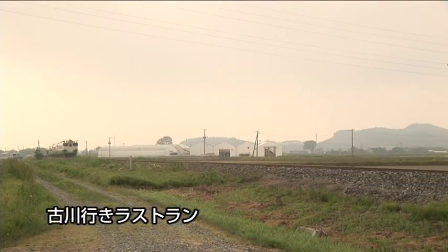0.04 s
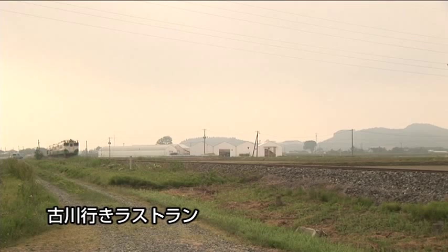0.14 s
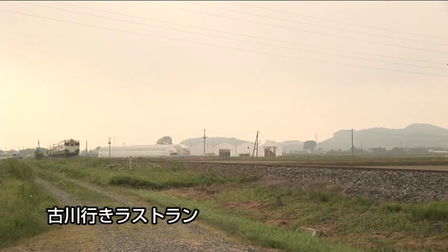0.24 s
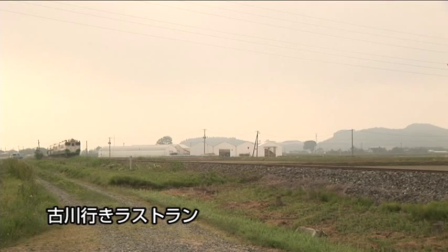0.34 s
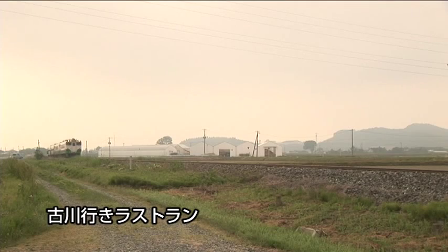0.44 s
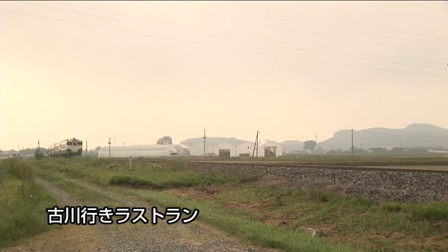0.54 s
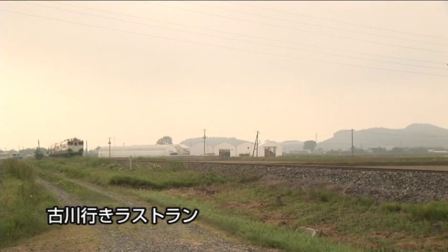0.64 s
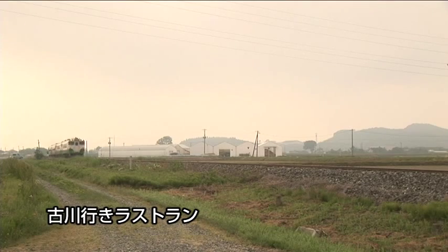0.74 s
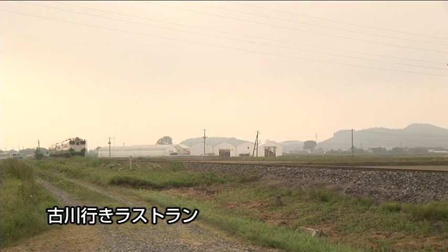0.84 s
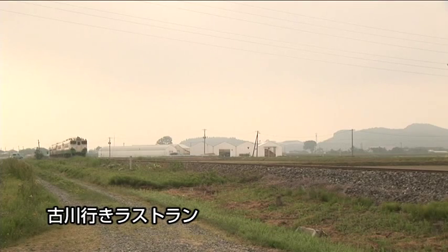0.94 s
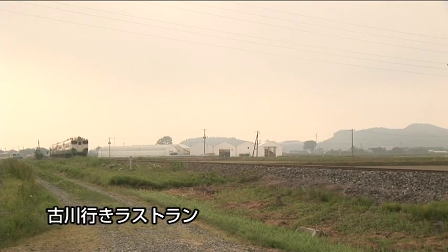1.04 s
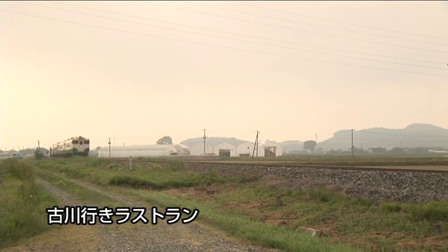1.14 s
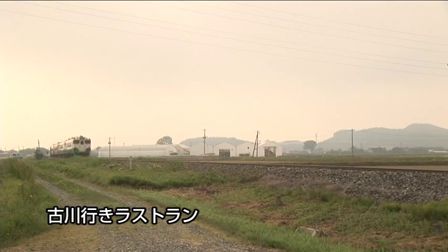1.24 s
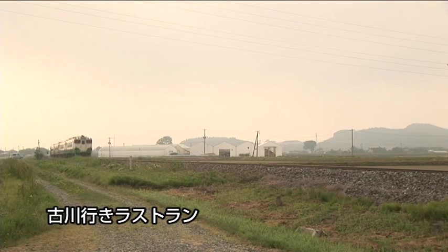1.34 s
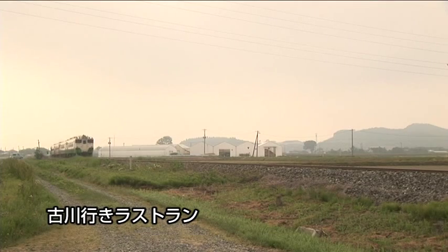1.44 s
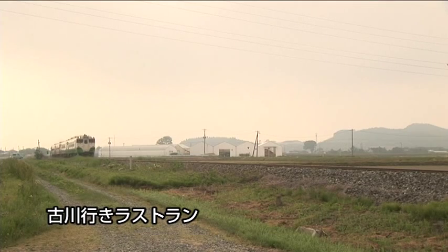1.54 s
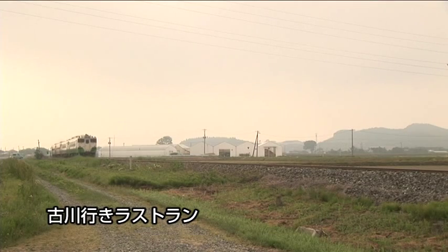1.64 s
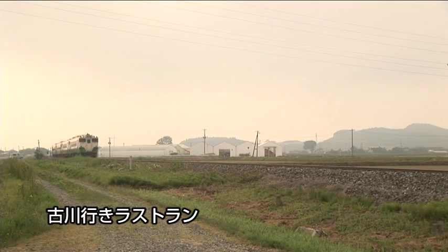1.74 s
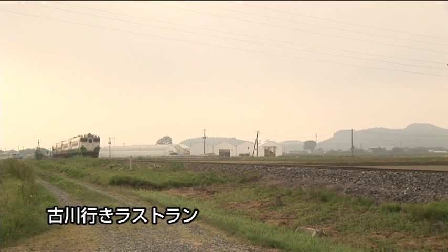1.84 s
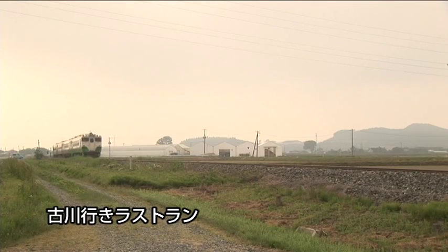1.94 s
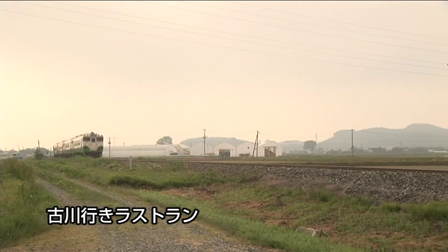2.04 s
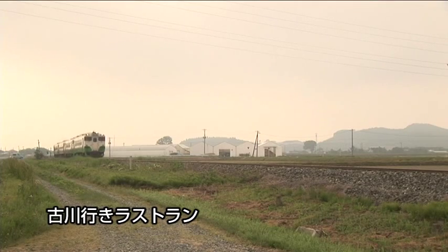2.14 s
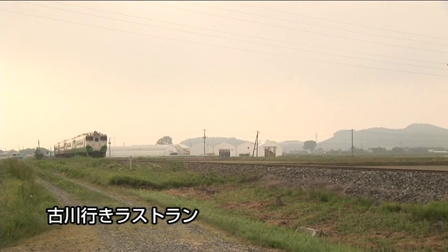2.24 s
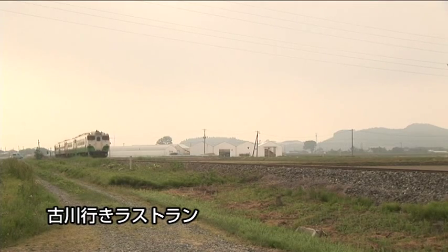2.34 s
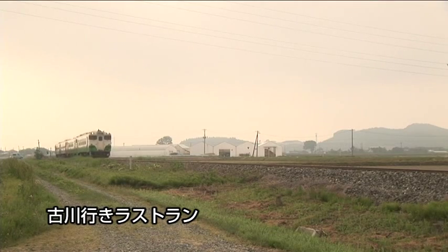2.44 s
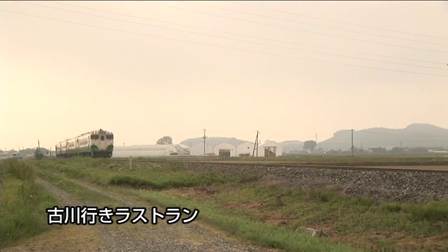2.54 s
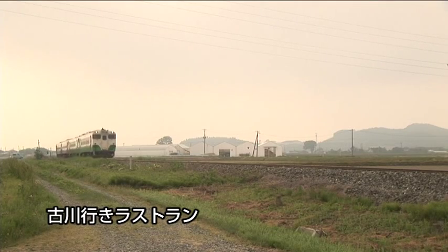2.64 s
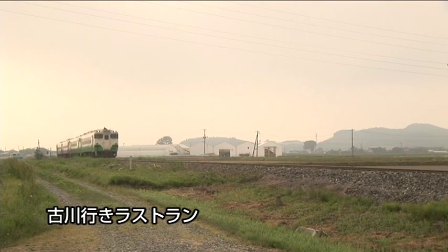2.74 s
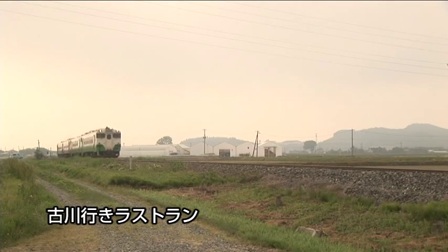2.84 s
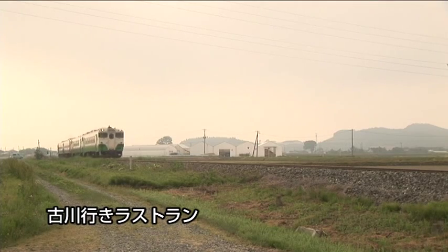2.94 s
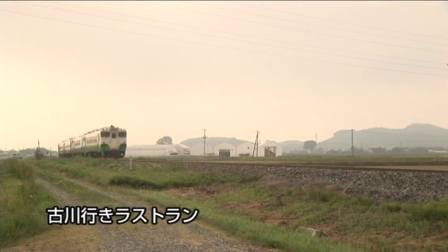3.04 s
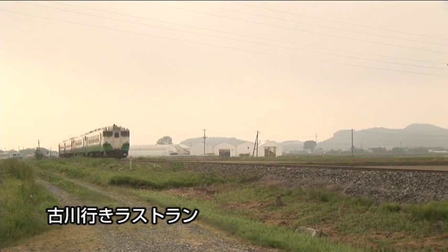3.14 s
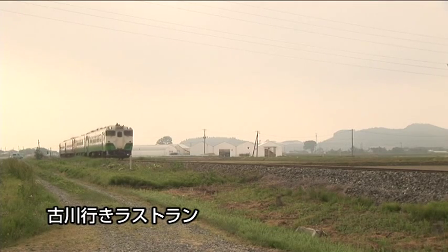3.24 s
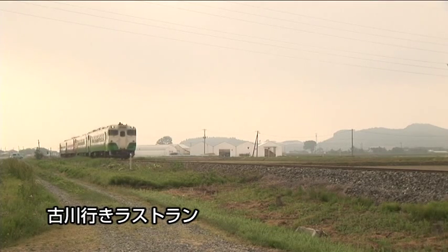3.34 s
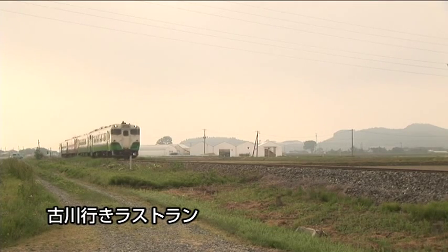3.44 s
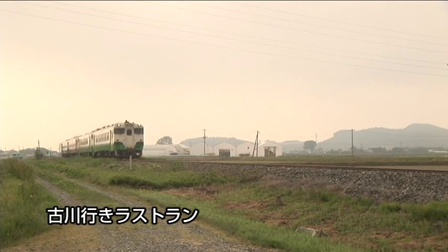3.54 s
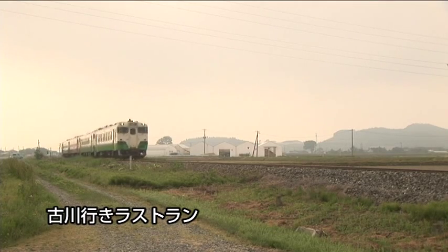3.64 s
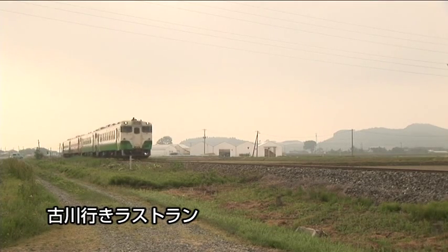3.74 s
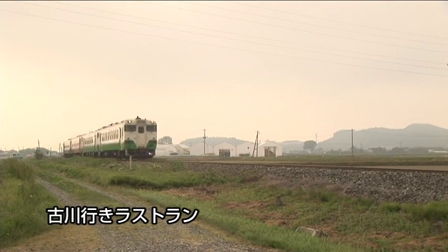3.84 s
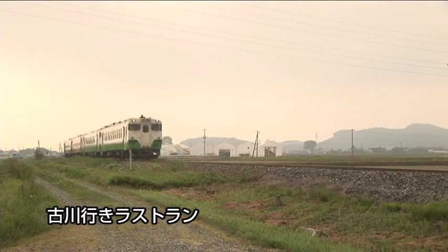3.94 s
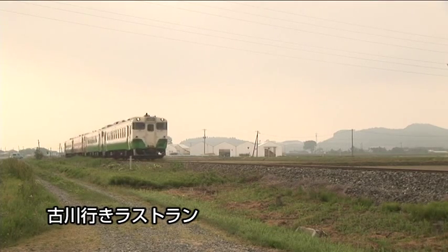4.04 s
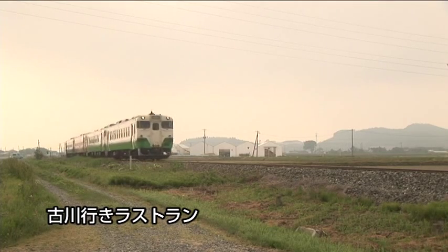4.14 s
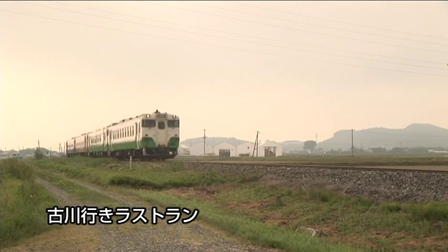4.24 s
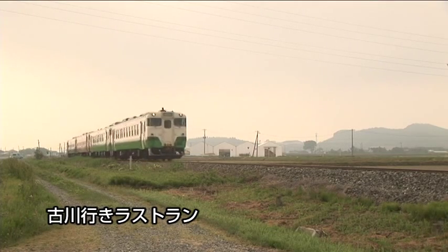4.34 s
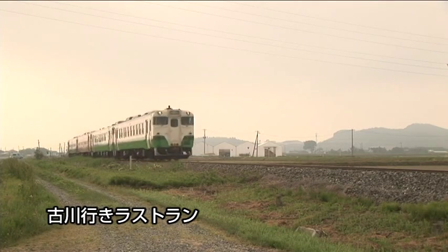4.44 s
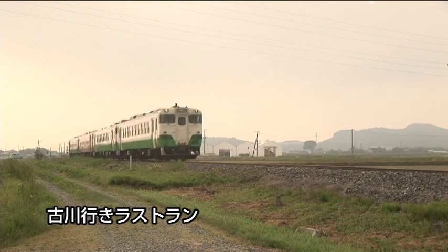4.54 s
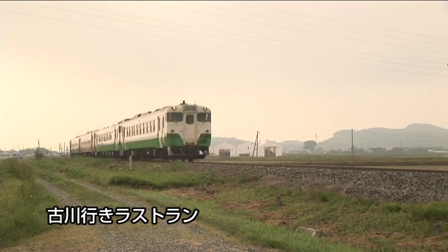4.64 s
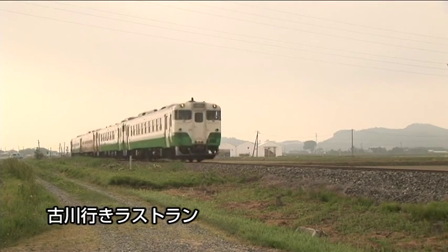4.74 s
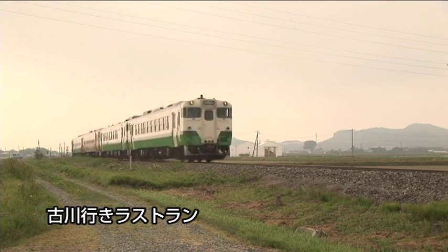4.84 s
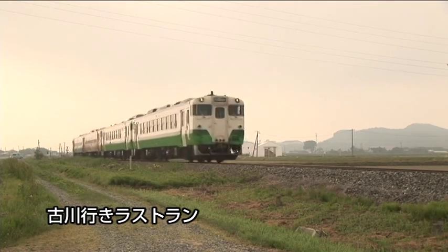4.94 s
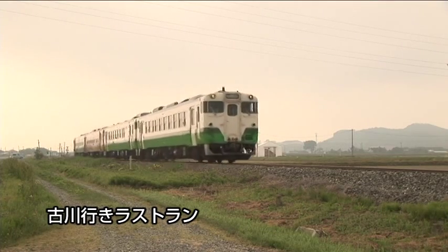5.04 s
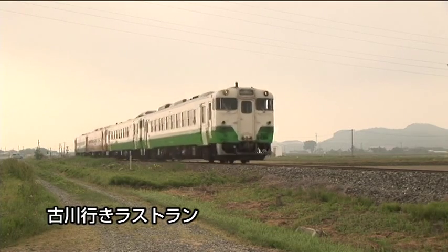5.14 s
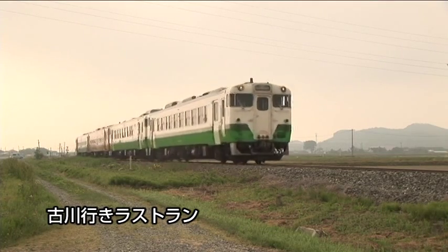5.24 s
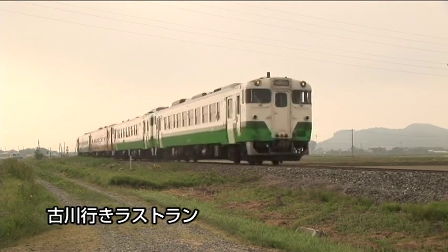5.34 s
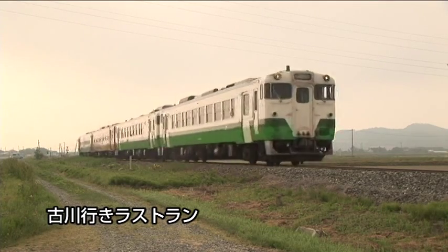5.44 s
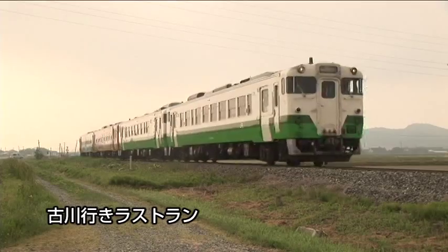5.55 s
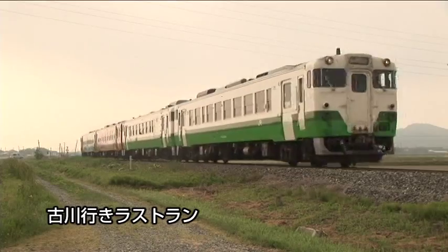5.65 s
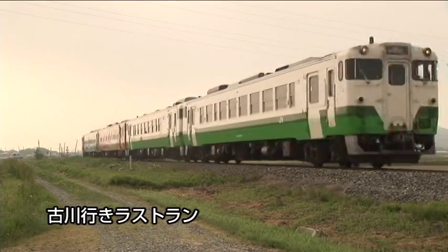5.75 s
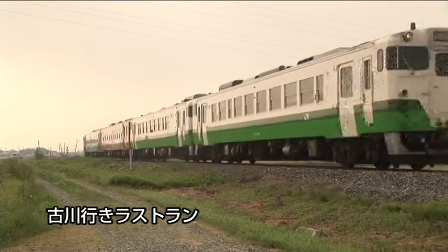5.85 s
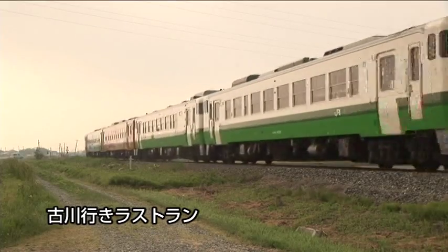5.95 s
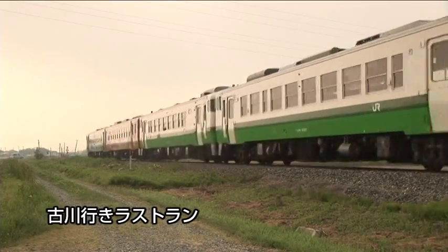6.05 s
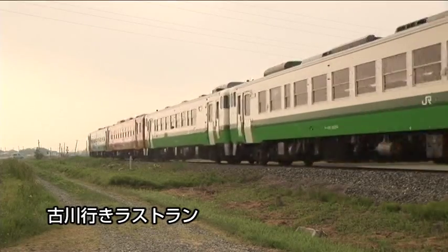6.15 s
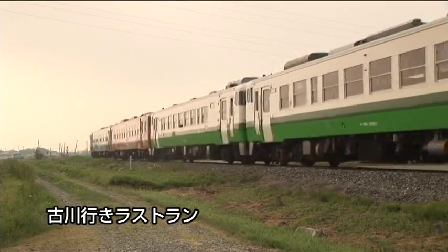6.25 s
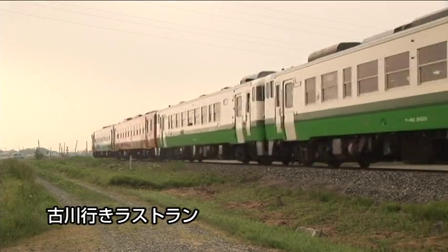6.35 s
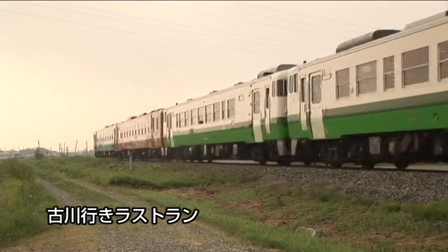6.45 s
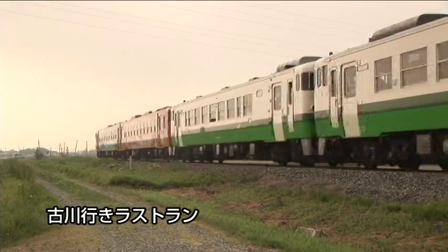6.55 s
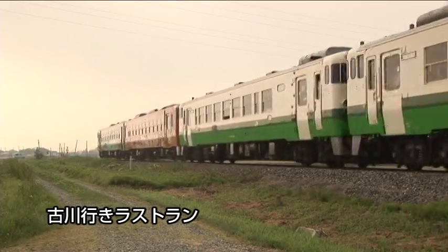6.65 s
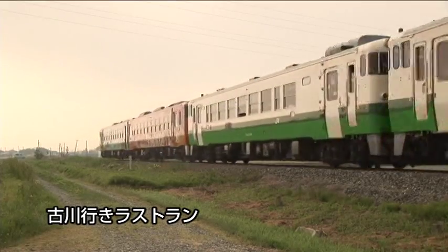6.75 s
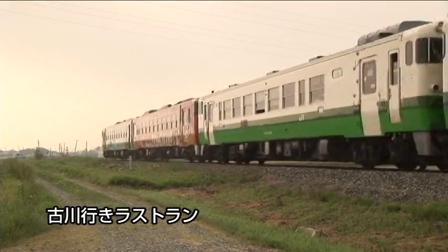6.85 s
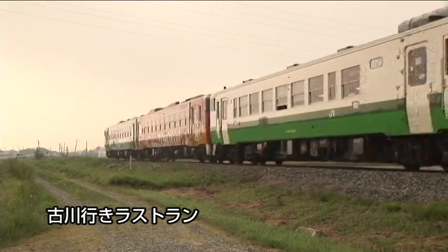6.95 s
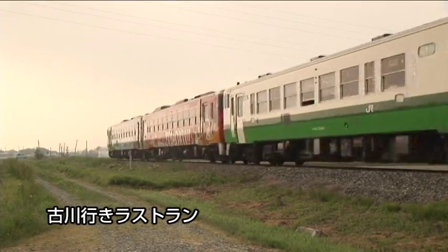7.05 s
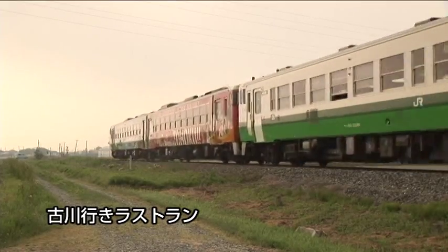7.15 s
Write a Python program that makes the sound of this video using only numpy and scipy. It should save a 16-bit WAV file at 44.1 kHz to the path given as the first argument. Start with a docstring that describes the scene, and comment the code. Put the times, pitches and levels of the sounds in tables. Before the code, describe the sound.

Outdoors in open farmland, a fixed stereo microphone beside the track hears small birds chirping and a distant diesel railcar's low drone. Paired wheel knocks over rail joints grow stronger, with soft echoes from buildings on the right. Rolling roar and metallic wheel singing swell, then the cars rush by close on the right with heavy clacks, gear whine and airy hiss, still passing at the end.

```python
"""An exhaust drone comes nearer as a diesel railcar set crosses open fields and passes close on the right.
Drone and gear whine are Doppler-shifted shaft orders; wheel roar, air hiss, field and breeze are shaped noise.
Rail joints knock in pairs, each a blow and a dying rattle through resonances; far buildings on the right
throw knocks back. Small birds chirp in gliding whistles over a faint shimmer of short falling notes."""
import sys
import numpy as np
from scipy import signal
from scipy.fft import rfft, irfft, next_fast_len
from scipy.io import wavfile
from scipy.ndimage import uniform_filter1d, map_coordinates

SR = 44100
rng = np.random.default_rng(int(sys.argv[2]) if len(sys.argv) > 2 else 0)


def unload_audio(sound):
    """Save the sound as a 16-bit wav file, at the path given as the first command line argument."""
    columns = np.transpose(np.atleast_2d(sound))
    # keep every value between -1 and 1, then stretch to whole-number steps
    steps = np.round(np.clip(columns, -1, 1) * 32767)
    wavfile.write(sys.argv[1], SR, steps.astype(np.int16))


def makeup_ratio(level_db):
    """Linear amplitude ratio for a level in decibels (20 dB per factor of ten)."""
    decades = np.asarray(level_db, float) / 20
    return 10 ** decades


N = 317079

# The approaching train. Each row: time in s, rolling roar ahead in dB before air dulling, air hiss in dB.
TRAIN = [(0.0, -56, -82), (0.64, -51, -86), (1.1, -51, -82), (1.6, -47, -93), (2.98, -43.5, -86),
         (3.48, -38, -68), (3.94, -36.5, -68), (4.39, -34, -63), (4.95, -29.5, -60), (5.25, -27, -55.5),
         (5.54, -23.5, -46.5), (5.97, -20, -49.5), (6.29, -17.5, -41.5), (6.75, -27.5, -33),
         (7.19, -27.5, -35)]
# The cars alongside. Each row: time in s, their roar in dB, share of the train to the right (0-1).
ALONGSIDE = [(0, -65.5, 0), (3, -52.5, 0.01), (5, -48, 0.06), (5.6, -35.5, 0), (6, -28, 0.65),
             (6.3, -22, 0.8), (6.6, -17, 0.77), (6.9, -16.5, 0.98), (7.19, -17.5, 0.97)]
# Left-right correlation of sound from ahead. Each row: frequency in Hz, correlation (0-1).
ALIKE_AHEAD = [(100, 1), (300, 1), (700, 0.85), (1300, 0.83), (2000, 1), (3700, 1), (5000, 0.86),
               (5800, 0.11), (8500, 0.044), (10500, 0.73), (13000, 0.93), (15000, 0.17)]
# Left-right correlation of sound from the right. Each row: frequency in Hz, correlation (0-1).
ALIKE_RIGHT = [(100, 0.75), (400, 0.91), (1300, 0.61), (1900, 1), (3000, 0.75), (4800, 0.79), (6300, 0.93),
               (9000, 0.94), (14000, 0.7)]


def unit(x):
    """Scaled to rms 1."""
    return x / np.sqrt(np.mean(x ** 2) + 1e-20)


def along(points, hz):
    """(Hz, value) points read on a log frequency axis."""
    f, v = np.transpose(points)
    return np.interp(np.log(hz + 1), np.log(f + 1), v)


def curves(rows):
    """One value per sample for each column after the time."""
    s, *cols = np.transpose(rows)
    return [np.interp(np.arange(N) / SR, s, c) for c in cols]


def right_share():
    """Share of the train to the right, per sample."""
    return np.clip(curves(ALONGSIDE)[1], 0, 1)


def wobble(rate):
    """A smooth random curve, rate knots a second."""
    return map_coordinates(rng.standard_normal(int(N * rate / SR) + 4), [np.arange(N) * rate / SR])


def filtered(x, response):
    """x times a complex response of frequency."""
    m = next_fast_len(N + 8192)
    return irfft(rfft(x, m) * response(np.fft.rfftfreq(m, 1 / SR)), m)[..., :N]


def coloured(spectrum):
    """The gain of a (Hz, dB) table."""
    return lambda hz: makeup_ratio(along(spectrum, hz))


def resonant(peaks, top_hz=np.inf):
    """The causal response of a few (Hz, width Hz, dB) resonances, rolled off steeply above top_hz."""
    def response(f):
        total = 0
        for k, (centre, width, db) in enumerate(peaks):
            damping = 1j * f * width
            total = total + (-1) ** k * makeup_ratio(db) * damping / (centre * centre - f * f + damping)
        return total / (1 + 1j * f / top_hz) ** 4
    return response


def rush(response, alike, patchy_db=None):
    """Stereo noise of rms 1 and given left-right correlation, with time-frequency patches of gain if asked."""
    pair = rng.standard_normal((2, N))
    if patchy_db:
        z = signal.stft(pair, nperseg=512)[2]
        patches = uniform_filter1d(rng.standard_normal(z.shape[1:]), size=6, axis=0)
        patches = uniform_filter1d(patches, size=10, axis=1)
        pair = signal.istft(z * makeup_ratio(patchy_db * unit(patches)), nperseg=512)[1][:, :N]

    def mid_side_gain(hz):
        angle = np.arccos(np.clip(along(alike, hz), -1, 1)) / 2
        return response(hz) * [np.cos(angle), np.sin(angle)]

    mid, side = filtered(pair, mid_side_gain)
    return unit(np.array([mid + side, mid - side]))


def housing(x):
    """The microphone housing cancels a narrow band of what both ports share."""
    # Each row: centre in Hz, width in Hz, gain of the cancelled part in dB.
    cancelled = [(4700, 510, -0.65)]
    return filtered(x, lambda hz: 1 - resonant(cancelled)(hz))


def from_right(pair):
    """Sound from the right reaches the two ports at different levels and phases."""
    # Each row: frequency in Hz, left level over right in dB.
    left_over_right_db = [(170, 4), (340, 1.5), (700, -6), (1200, -7.5), (1800, -16), (2800, 2.5),
                          (4600, -8), (6500, 0.5), (8300, -7), (10000, 1), (12500, -16.5), (15000, -3)]
    # Each row: frequency in Hz, left phase lead over right in rad.
    left_lead_rad = [(100, 0), (340, -.4), (520, -1.3), (1300, -1), (1800, -.2), (3100, -.1), (4500, -2.2),
                     (5500, -3.3), (9100, -3.4), (10300, -6), (13000, -7.1)]
    half = np.array([[.5], [-.5]])

    def port_response(hz):
        level = makeup_ratio(half * along(left_over_right_db, hz))
        return level * np.exp(1j * half * along(left_lead_rad, hz))

    return filtered(pair, port_response)


def heard_hz(abreast_s, nearest_m):
    """Doppler: the shaft rate, raised while the source comes on and sinking as it passes."""
    # Engine shaft gathering a little speed. Each row: time in s, firing rate at rest in Hz.
    shaft = [(0, 75.6), (2, 76.82), (3.5, 77.85), (6, 78.43)]
    speed_m_s, sound_m_s = 25.5, 343
    past_m = speed_m_s * (np.arange(N) / SR - abreast_s)
    return curves(shaft)[0] / (1 + speed_m_s / sound_m_s * past_m / np.hypot(past_m, nearest_m))


def orders(shaft_hz, lines, drift_rad, drift_rate, waver_db):
    """Orders (multiple, rms dB) of a rotating shaft as sines, phase and size a little unsteady."""
    turn = 2 * np.pi * np.cumsum(shaft_hz) / SR
    total = 0
    for k, db in lines:
        size = makeup_ratio(db + waver_db * wobble(drift_rate))
        total = total + size * np.sin(k * turn + drift_rad * wobble(drift_rate))
    return np.sqrt(2) * total


def exhaust():
    """The firing drone: two shaft orders, swelling and sagging as the engines of the cars beat slowly."""
    # Each row: time in s, first order level in dB, second order level in dB.
    order_levels = [(0, -41, -59), (1.1, -42, -55), (1.6, -37.5, -50.5), (2.15, -35.5, -50.5),
                    (2.55, -40.5, -40.5), (3.0, -35.5, -46.5), (3.35, -30.5, -42.5), (3.95, -26.5, -40),
                    (4.3, -27.5, -40), (4.55, -35, -39.5), (4.75, -27, -38), (5.05, -22, -35.5),
                    (5.6, -18, -31.5), (5.9, -16, -37), (6.05, -18, -44), (6.22, -17, -34.5),
                    (6.55, -22, -36), (7.19, -21.5, -29.5)]
    shaft_hz = heard_hz(abreast_s=6.88, nearest_m=10)
    return orders(shaft_hz, zip((1, 2), curves(order_levels)), drift_rad=0.54, drift_rate=9, waver_db=0.1)


def gears():
    """Tooth meshes whine at shaft multiples, swelling in as the drive draws level."""
    def swell(peak_s, peak_db, loss_db):  # loss_db: lost half a second off the peak
        return peak_db - loss_db * (2 * (np.arange(N) / SR - peak_s)) ** 2

    shaft_hz = heard_hz(abreast_s=7.0, nearest_m=11)
    mesh_db = swell(6.59, -24, 7.8)
    strand_db = swell(6.84, -27.5, 20)
    double_db = swell(6.38, -24.5, 11)
    # a lower mesh, the main mesh, its upper strand
    low = [(10, mesh_db - 7.5), (14, mesh_db), (15, strand_db)]
    whine = orders(shaft_hz, low, drift_rad=.35, drift_rate=22, waver_db=3)
    return whine + orders(shaft_hz, [(28, double_db)], drift_rad=.5, drift_rate=30, waver_db=3)


def breeze():
    """Light air rumbles on both ports: low noise with a slowly wandering level."""
    # Each row: frequency in Hz, relative density in dB per Hz.
    spectrum = [(12, -24), (25, -10), (45, 0), (70, -8), (120, -50)]
    # Each row: time in s, level in dB.
    gust = [(0, -52), (1.0, -50.5), (1.6, -51), (2.6, -50), (4, -56), (7.19, -48)]
    return makeup_ratio(curves(gust)[0] + 1.5 * wobble(4.05)) * rush(coloured(spectrum), ALIKE_AHEAD)


def open_field():
    """The background of the fields: patchy wide noise at a constant overall level."""
    # Each row: frequency in Hz, relative density in dB per Hz.
    spectrum = [(100, -15), (300, 3.5), (600, 0.5), (1200, 2), (2500, -3), (5000, -12), (7000, -59),
                (12000, -53), (15500, -57)]
    alike = [(100, 1.0), (500, 0.33), (1500, 0.31), (2200, 0.86), (3500, 0.5), (4500, 0.037)]
    return makeup_ratio(-53.5) * rush(coloured(spectrum), alike, patchy_db=2.4)


def rumble():
    """Low rolling noise that grows about half as fast in dB as the roar."""
    # Each row: frequency in Hz, relative density in dB per Hz.
    spectrum = [(15, -34), (28, -10), (45, -1), (65, 8.5), (100, 2.5), (140, -6.5), (200, -16), (300, -78)]
    rumble_db = -41.5 + 0.53 * (curves(TRAIN)[0] + 44.5)
    return makeup_ratio(rumble_db + 0.37 * wobble(2.3)) * rush(coloured(spectrum), ALIKE_AHEAD)


def roar_ahead():
    """Wheels on rail roar as patchy noise and sing on their sharpest modes; air dulls them when far."""
    # Each row: frequency in Hz, relative density in dB per Hz.
    spectrum = [(110, -5), (190, -1), (199, -3.5), (309, -5), (378, -8.5), (1200, -3.5), (1500, -14.5),
                (2290, -1), (2800, -2.5), (3130, -8), (3960, -8), (4700, -18), (5080, -15), (5760, -30.5),
                (8000, -44), (10400, -61), (17600, -120)]
    # Singing modes. Each row: centre in Hz, width in Hz, relative level in dB.
    modes = [(2325, 30, -3), (2765, 25, 0), (3540, 25, -1)]
    roar_db = curves(TRAIN)[0]
    roar = makeup_ratio(roar_db + 0.38 * wobble(6.1)) * rush(coloured(spectrum), ALIKE_AHEAD, patchy_db=1.4)
    sing_gain = (1 - right_share()) * makeup_ratio(roar_db - 12.5 + 5.1 * wobble(2.92))
    roar = roar + sing_gain * rush(resonant(modes, top_hz=4500), ALIKE_AHEAD)
    # treble gains on the rest as the train nears
    dulling = makeup_ratio(np.clip(1.4 * (roar_db + 41.5), -5, 1)) - 1
    return roar + dulling * filtered(roar, lambda hz: 1 / (1 + (2900 / (hz + 1)) ** 6))


def roar_beside():
    """Rolling roar of the cars alongside: patchy, quickly wavering noise."""
    # Each row: frequency in Hz, relative density in dB per Hz.
    spectrum = [(60, -8), (110, -10.5), (160, -9), (390, -10), (810, -2), (970, -7.5), (1200, -4.5),
                (1500, -16), (2200, -4), (3300, -11), (5000, -15.5), (6000, -15.5), (7000, -28),
                (7800, -44), (10000, -70), (16500, -120)]
    beside_db = curves(ALONGSIDE)[0]
    return makeup_ratio(beside_db + 0.91 * wobble(11)) * rush(coloured(spectrum), ALIKE_RIGHT, patchy_db=1.8)


def air_hiss():
    """High air noise, shared by power between ahead and right as the train draws alongside."""
    # Each row: frequency in Hz, relative density in dB per Hz.
    spectrum = [(4240, -28), (7200, -18), (8330, -0.5), (9120, -1.5), (10300, -5), (11900, -6),
                (14500, -8.5), (15600, -6.5)]
    share = right_share()
    gain = makeup_ratio(curves(TRAIN)[1] + .7 * wobble(12))
    ahead = np.sqrt(1 - share) * gain * rush(coloured(spectrum), ALIKE_AHEAD)
    right = np.sqrt(share) * gain * rush(coloured(spectrum), ALIKE_RIGHT, patchy_db=.7)
    return ahead, right


def chirps_and_shimmer():
    """Short gliding whistles, far off to one side, which the ports take partly out of step."""
    # Bird notes. Each row: start in s, level in dB, start in Hz, end in Hz, length in s.
    chirps = [(.025, -61, 5350, 4750, .025), (.14, -57, 5160, 4700, 0.024), (.175, -60, 5150, 4800, .02),
              (.2, -60, 4170, 3920, .06), (.33, -56, 4000, 3900, .027), (.361, -56, 3950, 3870, 0.023),
              (.732, -60, 6060, 4700, 0.028), (0.86, -62, 4950, 5100, 0.041), (1.02, -59, 5150, 4780, .025),
              (1.42, -62, 5300, 4700, .022), (1.53, -57, 5350, 4770, .022), (2.108, -54, 4700, 5500, .015),
              (2.128, -61, 5950, 4700, 0.029), (2.255, -52, 4870, 4800, 0.027),
              (2.41, -61, 5070, 4800, .025), (2.815, -62, 5260, 4700, .025), (2.901, -58, 4700, 5000, .018),
              (2.93, -56, 5270, 4800, .025), (2.97, -57, 5200, 4870, .022), (3.805, -52, 5120, 4600, 0.032)]
    # faint random short falling notes, a shimmer near 5 kHz
    when, size, pitch = rng.random((45, 3)).T
    top_hz = 5200 + 300 * (pitch - .5)
    shimmer = zip(when * 3.6, -67.5 + 8 * (size - .5), top_hz, top_hz - 350, 0.028 * (.5 + pitch))
    notes = np.zeros(N + SR, complex)
    for s, db, start_hz, end_hz, length_s in [*chirps, *shimmer]:
        u = np.linspace(0, 1, int(length_s * SR))
        glide_hz = start_hz + (end_hz - start_hz) * u ** 1.33
        envelope = np.sqrt(np.abs(np.sin(np.pi * u)))
        whistle = np.exp(2j * np.pi * np.cumsum(glide_hz) / SR)
        notes[int(s * SR):][:len(u)] += makeup_ratio(db) * envelope * whistle
    # leaves and ground break the whistles up on the way
    flutter = makeup_ratio(3 * wobble(200)) * np.exp(.6j * wobble(350))
    call = flutter * notes[:N]
    return housing(call.real) + .7 * call.imag * np.array([[1], [-1]])


def axles(s, db, second_db, gap_s):
    """Times and levels of both axles of each bogie."""
    return np.r_[s, s + gap_s], np.r_[db, db + second_db]


def bursts(s, db, response, rise, t60, blow_db):
    """At each time a sharp blow and a dying noise rattle, both through one response."""
    t = np.arange(SR // 4) / SR
    at = (s * SR).astype(int)
    envelope = makeup_ratio(-60 * t / t60) * (1 - np.exp(-t / rise))
    rattle = signal.fftconvolve(np.bincount(at, makeup_ratio(db), N), envelope)[:N]
    ring = filtered(np.eye(1, N)[0], response)
    blows = np.bincount(at, makeup_ratio(db + blow_db), N)
    return rattle * rush(response, ALIKE_AHEAD) + filtered(blows, response) / np.abs(ring).max()


def joints():
    """Each joint shakes bogie, car body and wheel, each dying at its own speed; the bogie starts first."""
    # Bogies over joints. Each row: first axle in s, reference level in dB, second axle in dB re first,
    # thump and wheel ring in dB re reference; the parts add offsets below.
    bogies = [(0.602, -27.5, -6, -12.5, -14), (1.582, -21.5, -6.5, -11, -14.5),
              (1.942, -28.5, -5.5, -9.5, -14.5), (2.557, -20.5, -3.5, -13, -19), (3.307, -39.5, -25, 6, -6),
              (3.525, -18.5, -6.5, -14, -7), (4.177, -39.5, 3, 1, -14), (4.49, -17, -5.5, -11, -6),
              (4.718, -19, -5, -20, -11.5), (5.448, -4, -3.5, -10.5, -12), (5.977, -3, -0.5, -14, -19.5),
              (6.414, -3, -1.5, -20, -20), (6.61, -11, -10, -19, -32), (6.925, -3.5, -20, -17, -19),
              (7.048, 1, -3, -20.5, -41)]
    # Resonances of bogie, body and wheel. Each row: centre in Hz, width in Hz, relative level in dB.
    bogie_modes = [(135, 33, -2.5), (238, 76, 0), (328, 187, -4)]
    body_modes = [(538, 200, -3.5), (756, 143, 2), (1040, 280, 1.5)]
    wheel_modes = [(2055, 550, 1), (2385, 180, 7), (2797, 143, 7.5), (3535, 240, 4), (4010, 460, 0),
                   (5070, 83, 0.5)]
    # Sharp tick of the blow. Each row: frequency in Hz, relative level in dB.
    tick_spectrum = [(3000, -50), (5500, 4), (7500, -14), (10000, -5), (13500, -17), (15800, -35)]
    share = right_share()
    first_s, db, second_db, thump_db, wheel_db = np.transpose(bogies)
    gap_ahead_s, gap_right_s = .09, .101
    gap_s = gap_ahead_s + (gap_right_s - gap_ahead_s) * share[(first_s * SR).astype(int)]
    s, knock_db = axles(first_s, db, second_db, gap_s)
    thump_db = knock_db + np.tile(thump_db, 2)
    wheel_db = knock_db + np.tile(wheel_db, 2)
    roar_db = curves(TRAIN)[0][(s * SR).astype(int)]
    # the air dulls the tick less as the train nears
    tick_db = wheel_db - 16.5 + 0.89 * np.minimum(roar_db + 36, 0)
    # near blows stand out of their rattle more than far ones
    sharper_db = 7 * np.clip((roar_db + 32) / 10, 0, 1)
    knocks = bursts(s - .006, thump_db + 7, resonant(bogie_modes, top_hz=940),
                    rise=0.017, t60=0.12, blow_db=-9 + sharper_db)
    knocks += bursts(s + 0.00303, knock_db - 6, resonant(body_modes, top_hz=2400),
                     rise=0.0053, t60=0.07, blow_db=-6 + sharper_db)
    knocks += bursts(s, wheel_db + 4, resonant(wheel_modes, top_hz=5500), rise=0.0035, t60=0.2, blow_db=-13)
    knocks += bursts(s, tick_db, coloured(tick_spectrum), rise=0.0035, t60=0.15, blow_db=-14)
    return np.sqrt(1 - share) * knocks, np.sqrt(share) * knocks


def echoes():
    """Far buildings on the right throw bogie knocks back, softened through a few resonances."""
    # Each row: first axle in s, level in dB before a 5 dB cut, second axle in dB re first.
    returns = [(1.282, -30, -1.5), (1.94, -28.5, -4), (2.259, -31, -21), (2.334, -30, -4), (2.97, -32.5, 0),
               (3.373, -32, -5), (3.999, -32, -10), (4.383, -20.5, -4), (5.022, -30, -14),
               (5.417, -12.5, -5)]
    # Each row: centre in Hz, width in Hz, relative level in dB.
    wall_modes = [(780, 230, -3), (1164, 136, 4), (1770.3, 280, -7)]
    s, db = axles(*np.transpose(returns), gap_s=.094)
    return bursts(s - .004, db - 5, resonant(wall_modes, top_hz=2500), rise=0.011, t60=0.15, blow_db=-3)


def scene():
    """Sources ahead come through the housing; those alongside come from the right."""
    hiss_ahead, hiss_right = air_hiss()
    knocks_ahead, knocks_right = joints()
    ahead = rumble() + roar_ahead() + hiss_ahead + knocks_ahead
    right = gears() + roar_beside() + hiss_right + knocks_right + echoes()
    return exhaust() + breeze() + open_field() + housing(ahead) + chirps_and_shimmer() + from_right(right)


def low_pass(x):
    """Removes everything above the highest recorded frequency."""
    return signal.sosfilt(signal.butter(12, 15740, fs=SR, output="sos"), x)


def record(dry):
    """The loudest peaks clip softly and nothing passes above the band limit."""
    top_hz = 15750
    clipped = dry / (1 + np.abs(dry) ** 8) ** (1 / 8)
    mix = filtered(clipped, lambda hz: hz < top_hz)
    return low_pass(mix)


dry = scene()
out = record(dry)
unload_audio(out)
```